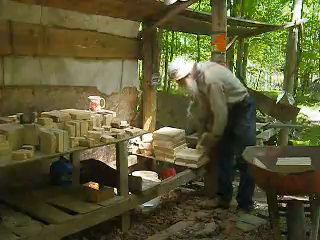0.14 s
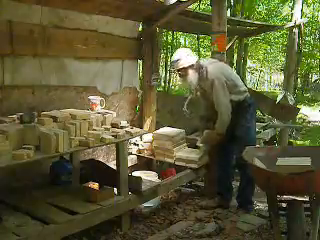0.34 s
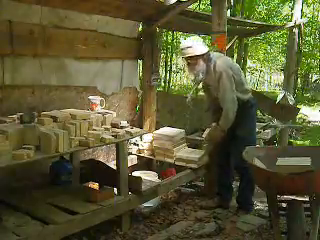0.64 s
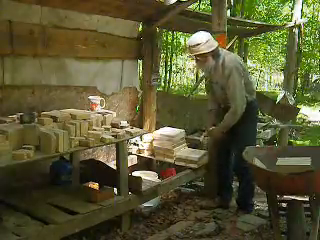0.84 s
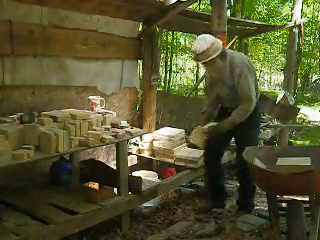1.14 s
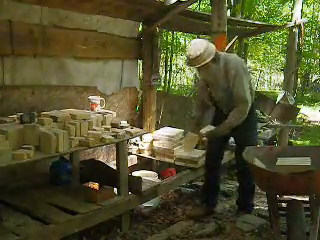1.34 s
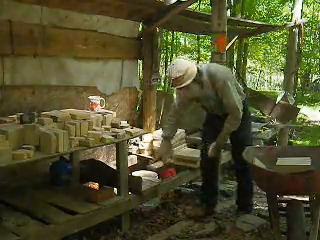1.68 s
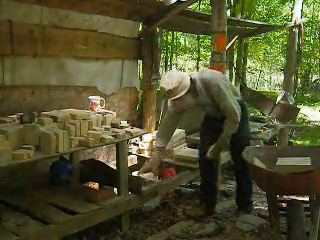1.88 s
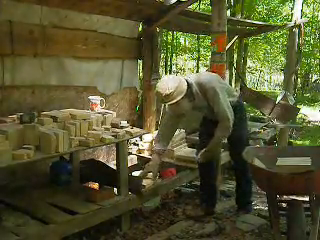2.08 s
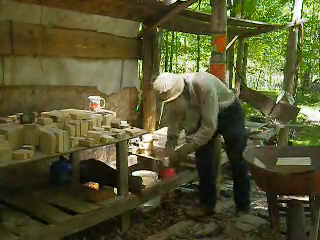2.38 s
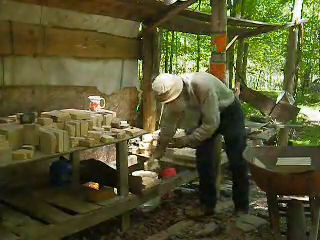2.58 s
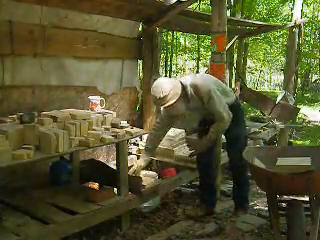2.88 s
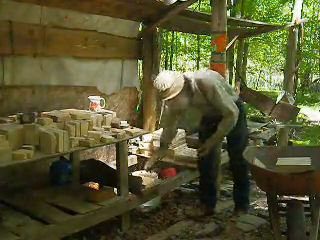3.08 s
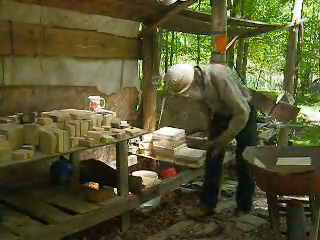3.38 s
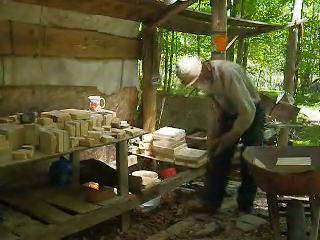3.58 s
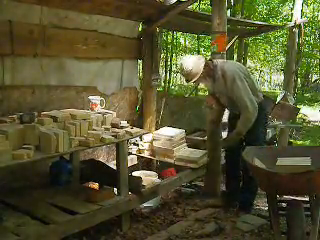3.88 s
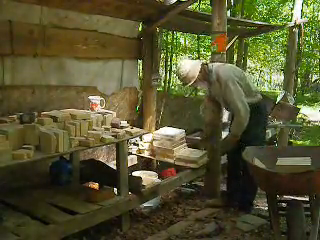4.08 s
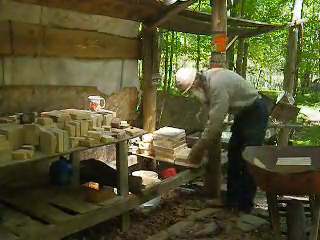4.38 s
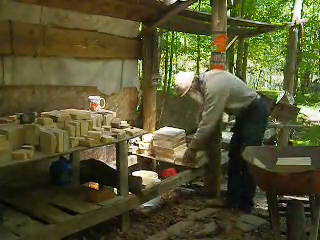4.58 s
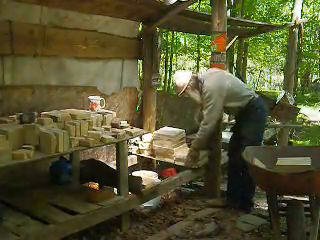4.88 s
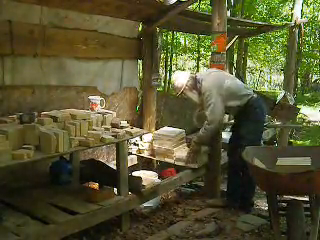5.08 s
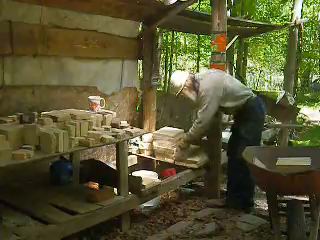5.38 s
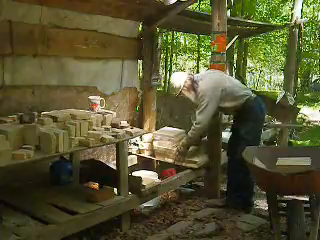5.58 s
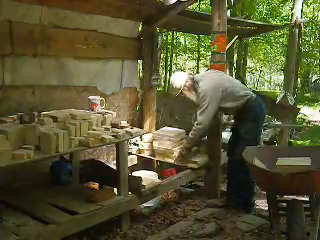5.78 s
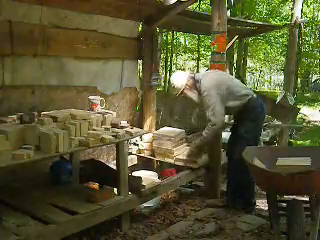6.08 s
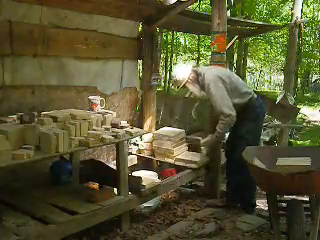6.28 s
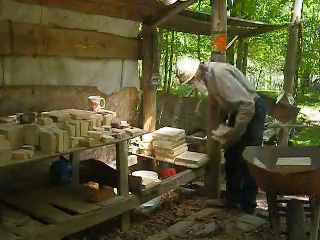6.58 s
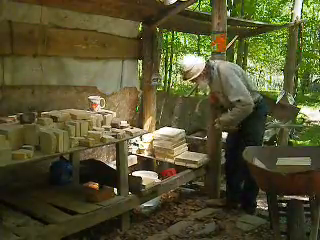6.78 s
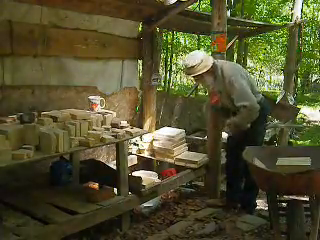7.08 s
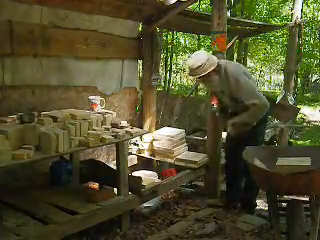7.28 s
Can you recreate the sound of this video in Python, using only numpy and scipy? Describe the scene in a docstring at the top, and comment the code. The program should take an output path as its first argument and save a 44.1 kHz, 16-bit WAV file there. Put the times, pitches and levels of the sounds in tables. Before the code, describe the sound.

At the very start a brick slab knocks and a ceramic shard clinks brightly on a smaller chip, then brushes it lightly. From about 0.7 to 1.35 seconds the shard grates across the chip in two long, ringing pulls. At 1.5 seconds a brick touches down softly on a stack. Louder, rocking clacks follow at 2.3 and 3.1 seconds, with wooden boards booming beneath, and a lighter one near 3.9, with gritty scuffs in between and just after. From 5 seconds a larger slab shifts with small taps, then knocks firmly into place at about 5.7. It taps again near 6 seconds, shuffles faintly, and ends with two short scraping pushes around 7.3 and 7.4. The knocks have a short, tight echo from the open shed. A steady outdoor hush and low rumble lie underneath, and a small, coarse microphone adds a gritty hiss throughout.

```python
"""Sorting broken firebricks in an open shed. First a slab knocks, and a shard clinks on a smaller chip,
brushes it and grates across it in two long pulls. From 1.5 s bricks are set down on a stack: they clack,
rock and scuff, and the wooden boards boom beneath. From 5 s the larger slab is shifted and knocked
into place, ending on two short pushes. A steady outdoor hush and a low rumble lie under it all,
and a small camera's coarse sampling adds a gritty sheen throughout."""
import sys
import numpy as np
from scipy import signal
from scipy.fft import rfft, irfft, next_fast_len
from scipy.io import wavfile
from scipy.ndimage import map_coordinates

SR = 44100
rng = np.random.default_rng(int(sys.argv[2]) if len(sys.argv) > 2 else 0)


def master_out(mix):
    """Clip the mix to full scale and print it as 16-bit PCM to the path in sys.argv[1]."""
    frames = np.transpose(np.atleast_2d(mix))
    ceiling = np.clip(frames, -1, 1)
    pcm = np.round(ceiling * 32767).astype(np.int16)
    wavfile.write(sys.argv[1], SR, pcm)


N = 328104
TIME = np.arange(N) / SR

# The voices of the loose pieces. Each row: pitch in Hz, ring time (t60) in seconds,
# relative level in dB when struck, and when rubbed.
SHARD_MODES = [(3025, 0.08, -2.5, -5), (2987, 0.09, -7.5, -4.5), (3104, 0.097, -4, 3), (3124, .025, -4, -8),
               (2887, 0.027, 6, -8)]
CHIP_MODES = [(1996, 0.1, -5.5, -22), (2715, 0.091, 1, 2.5), (2780, 0.065, -0.5, -10)]
SLAB_MODES = [(1403, 0.13, -3, -3.5), (1735, .11, -1.5, -4.5), (1793, 0.077, -3.5, -8),
              (2156, 0.076, -7, -2.5), (3546, 0.084, -4.5, 3.5)]
# The voices of one brick, the stack and the boards beneath it.
# Each row: pitch in Hz, ring time (t60) in seconds, relative level in dB.
BRICK_MODES = [(1180, 0.085, -3), (1415, .1, -4), (1840, 0.09, 2), (2490, .11, -7), (2560, 0.062, 3)]
STACK_MODES = [(414, 0.15, -6), (472, 0.11, -9), (523, 0.071, 2.5), (695.4, 0.075, -3.5),
               (923, 0.053, -4.5), (1227, 0.097, -19)]
BOARD_MODES = [(215, 0.081, -3), (208.2, 0.46, -23), (323, 0.098, -10)]
# Tone curves for the hits, the friction and the background. Each row: frequency in Hz, gain in dB.
CLACK_EQ = [(25, -39), (60, -32), (200, -27.5), (700, -11), (1000, 2), (1700, 3), (3000, -6), (4000, 0.5)]
THUD_EQ = [(40, -27), (140, -9.5), (210, -7.5), (500, -2), (720, -3.5), (1000, -14), (2000, -33.5),
           (4000, -48)]
RUB_EQ = [(60, -21), (250, -10.5), (550, 0.5), (1000, -2), (1900, 2), (2700, -5.5), (4000, -9), (4400, -51)]
GRIT_EQ = [(200, -16), (1200, -20), (2200, -3), (3100, 1.5), (4000, 2.5), (4400, -50)]
HUSH_EQ = [(20, -15), (60, -11), (90, 0), (140, 1.5), (300, 0), (600, -2.5), (1200, -5.5), (2500, -6.5),
           (4000, -5.5), (4400, -49)]
RUMBLE_EQ = [(12, -18), (30, -0.5), (60, 4.0), (100, -3.0), (200, -31), (600, -80)]

# Cue levels are faders: each sets one layer's strength from cue to cue.
# Bricks land on the stack. Each row: start in seconds, stack thud, board boom and clack in dB,
# treble corner in Hz, loss on the first rock in dB.
BRICK_LANDINGS = [ (1.503, -31, -32.5, -54, 3000, 5.5), (2.261, -23, -17, -28, 700, 2),
                  (2.288, -22, -42, -33, 900, 16.5), (2.3196, -17, -27.5, -10.5, 1780, 6.5),
                  (3.1235, -28.5, -38.5, -34.5, 1000, 4.5), (3.1345, -22.5, -14, -21, 1210, 3),
                  (3.192, -35, -32.5, -39.5, 900, 0.5), (3.9466, -27.5, -29.5, -33.5, 2500, 21.5), ]
# The slab hits its neighbours. Each row: start in seconds, slab ring, stack thud and clack in dB,
# treble corner in Hz, first rocking gap in seconds.
SLAB_HITS = [ (0.03, -26, -42, -46, 1900, 0.015), (5.053, -40.5, -38, -43, 2400, 0.022),
             (5.147, -46, -45, -44, 3000, .006), (5.672, -33, -35.5, -31.5, 2200, .005),
             (5.7345, -18, -20.5, -21.5, 1600, .0055), (5.969, -50, -40.5, -30.5, 6900, 0.0094), ]
# The shard brushes the chip. Each row: middle and length in seconds, ring in dB.
SHARD_BRUSHES = [(0.051, 0.11, -40), (0.197, 0.15, -50.5), (0.423, 0.1, -43.5)]
# Two pulls across the chip, one envelope each. Each row: time in seconds, ring and rub in dB.
SHARD_PULLS = [
    [(0.72, -55, -54), (0.726, -59, -67.5), (0.756, -39.5, -44), (0.8, -34, -48.5), (0.834, -34.5, -56.5),
     (0.848, -33.5, -51), (0.864, -38.5, -50.5), (0.928, -54, -65), (0.93, -52, -58)],
    [(0.93, -51, -63), (0.974, -43.5, -48.5), (0.988, -44, -57), (1.094, -42, -40), (1.13, -48, -43.5),
     (1.252, -38, -50), (1.306, -64, -55.5), (1.34, -56, -57), (1.35, -72, -57)],
]
# Bricks scuff the stack. Each row: middle and length in seconds, coarse rub and fine grit in dB.
BRICK_SCUFFS = [ (1.516, 0.059, -44, -41), (2.669, 0.18, -52.5, -57), (2.741, 0.049, -47.5, -47),
                (3.141, 0.057, -43.5, -49.5), (3.205, 0.058, -51.5, -51.5), (3.772, .2, -68, -52),
                (3.996, .12, -50, -48), (4.085, 0.081, -42, -37), ]
# The slab is pushed along. Each row: middle and length in seconds, rub and ring in dB.
SLAB_PUSHES = [ (5.082, 0.14, -52, -53.5), (5.727, 0.058, -52.5, -48), (5.969, 0.033, -47.5, -47.5),
               (6.012, 0.028, -53, -48), (6.146, .13, -51, -62), (7.282, 0.065, -49.5, -44),
               (7.431, 0.073, -49.5, -44.5), ]
# Soft low bumps. Each row: start in seconds, level in dB, pitch in Hz.
LOW_BUMPS = [(1.536, -37.5, 128), (2.32, -35, 95.5), (2.511, -34, 57.1), (5.32, -47, 55.2)]
# The rumble rises and falls. Each row: middle and length in seconds, level in dB.
RUMBLE_SWELLS = [(2.9, 0.28, -56.5), (5.264, 0.42, -54.5), (6.727, 0.28, -58)]

CLINK_S, CLINK_CORNER_HZ = 0.0717, 11900
CLINK_SHARD_DB, CLINK_CHIP_DB, CLINK_CLACK_DB, CLINK_THUD_DB = -8.5, -15, -14.5, -61
BRICK_RING_DB, SIDEWAYS_BOOM_DB = -9, -12.5  # trims: ring from the clack fader, boom from the thud fader
PULL_RING_DB, PULL_RUB_DB = 1.4, -0.3  # trims on the pull envelopes
BRUSH_RUB_DB, SHARD_GRIT_DB, PUSH_GRIT_DB = -10, -6, -3.5  # rub against ring; grit against rub
HANDOVER_S, HANDOVER_DB_PER_S, HANDOVER_LIMIT_DB = 1, 33, 6  # crossfade from shard to chip
HUSH_DB, RUMBLE_FLOOR_DB = -48.5, -62.5
CAMERA_HZ, TOP_HZ, STEPS = 8000, 15700, 128  # sample rate, treble cutoff, steps from zero to full scale


def knocks():
    """Each contact cracks, thuds through the stack into the boards and rings the pieces that touch."""
    out = np.zeros(N)
    crush_age = np.arange(SR // 50) / SR / 0.000974  # 1 at the main impact
    thud = impulse(lambda hz: colour(THUD_EQ, hz))
    for s, thud_db, boom_db, clack_db, corner_hz, bodies in [*shard_clink(), *set_downs(), *slab_knocks()]:
        # high spots of the rough faces crush for a millisecond around the main impact
        crush = rng.standard_normal(len(crush_age)) * crush_age * np.exp(-crush_age)
        crush *= amp(-2.5) / np.linalg.norm(crush)
        crush[np.argmin(np.abs(crush_age - 1))] += 1
        # trapped sand leaves some treble even in a soft contact
        contact = impulse(lambda hz: colour(CLACK_EQ, hz) * (softness(hz, corner_hz) + amp(-5.5)))
        clack = signal.fftconvolve(crush, contact)
        add(out, s - .001, amp(clack_db + 17.5) * shed_echo(clack, wet_db=1, t60=0.14))
        add(out, s, amp(thud_db + 30) * shed_echo(thud, wet_db=6.5, t60=0.15))
        stack = amp(thud_db - 1) * ring(STACK_MODES, scatter_db=-0.2)
        boards = amp(boom_db) * ring(BOARD_MODES, scatter_db=1.2)
        pieces = sum(amp(db) * ring(modes, scatter_db=1.5, corner_hz=corner_hz) for modes, db in bodies)
        ringing = low_cut(stack + boards, low_hz=181) + pieces
        add(out, s, shed_echo(ringing, wet_db=-15.5, t60=0.37))
    return out


def set_downs():
    """Contacts of bricks landing on the stack and tipping from edge to face."""
    for start, thud_db, boom_db, clack_db, corner_hz, loss_db in BRICK_LANDINGS:
        for s, db in rocking(start, gap_s=.0102, loss_db=loss_db):
            bodies = [(BRICK_MODES, clack_db + BRICK_RING_DB + db)]
            yield s, thud_db + db, boom_db + db, clack_db + db, corner_hz, bodies


def slab_knocks():
    """Contacts of the slab knocking sideways into its neighbours, with little boom from the boards."""
    for start, ring_db, thud_db, clack_db, corner_hz, gap_s in SLAB_HITS:
        for s, db in rocking(start, gap_s, loss_db=1.5):
            bodies = [(SLAB_MODES, ring_db + db)]
            yield s, thud_db + db, thud_db + SIDEWAYS_BOOM_DB + db, clack_db + db, corner_hz, bodies


def shard_clink():
    """Hard, bright contacts of the shard chattering on the chip; both ring."""
    for s, db in rocking(CLINK_S, gap_s=.0031, loss_db=1):
        bodies = [(SHARD_MODES, CLINK_SHARD_DB + db), (CHIP_MODES, CLINK_CHIP_DB + db)]
        thud_db = CLINK_THUD_DB + db
        yield s, thud_db, thud_db + SIDEWAYS_BOOM_DB, CLINK_CLACK_DB + db, CLINK_CORNER_HZ, bodies


def rocking(s, gap_s, loss_db, shrink=.9):
    """A piece rocks to rest: time and level of three touches, ever sooner and weaker."""
    touch = np.arange(3)
    gaps = gap_s * shrink ** touch
    return zip(s + np.cumsum(gaps) - gaps, -loss_db * touch ** 2)


def ring(modes, scatter_db, corner_hz=SR, rubbed=False):
    """One body rings out in damped modes, their balance scattered as if touched at a random spot."""
    t = np.arange(SR // 3) / SR
    hz, t60, *levels = np.transpose(modes)[:, :, None]
    db = levels[-1] if rubbed else levels[0]
    gains = amp(db + scatter_db * rng.standard_normal(hz.shape))
    gains *= rng.choice([-1, 1], hz.shape) * softness(hz, corner_hz)
    partials = gains * amp(-60 * t / t60) * np.sin(2 * np.pi * hz * t)
    return np.sum(partials, axis=0) / np.linalg.norm(amp(db))


def softness(hz, corner_hz):
    """A softer, longer contact rolls off the treble above its corner."""
    return 1 / np.sqrt(1 + (hz / corner_hz) ** 2)


def low_cut(x, low_hz):
    """The ring of stack and boards is cut below low_hz, so it carries little deep bass."""
    return signal.sosfilt(signal.butter(2, low_hz, "highpass", fs=SR, output="sos"), x)


def scrapes():
    """Sliding pieces rub, hiss with grit and sing in their own modes."""
    shard_rub, shard_grit, shard, chip = shard_strokes()
    brick_rub, brick_grit = brick_strokes()
    slab_rub, slab_grit, slab = slab_strokes()
    powers = [shard_rub + brick_rub + slab_rub, shard_grit + brick_grit + slab_grit, shard, chip, slab]
    faces = [impulse(lambda hz: colour(eq, hz)) for eq in (RUB_EQ, GRIT_EQ)]
    pieces = [ring(modes, scatter_db=1.7, rubbed=True) for modes in (SHARD_MODES, CHIP_MODES, SLAB_MODES)]
    out = np.zeros(N)
    for power, body in zip(powers, faces + pieces):
        damped = body * amp(-60 * np.arange(len(body)) / SR / .33)  # the rubbing faces choke the ring
        friction = grating(np.sqrt(power), grains_per_s=5000, spiky_db=1.53)
        out += signal.oaconvolve(friction, damped / np.linalg.norm(damped))[:N]
    return shed_echo(out, wet_db=-6, t60=0.033)[:N]


def shard_strokes():
    """Power envelopes of rub, grit, shard ring and chip ring as the shard slides on the chip."""
    singing = sum(swell(*row) for row in SHARD_BRUSHES)
    rub = amp(BRUSH_RUB_DB) ** 2 * singing
    for pull in SHARD_PULLS:
        s, ring_db, rub_db = np.transpose(pull)
        sliding = (TIME >= s[0]) & (TIME < s[-1])
        singing += sliding * amp(np.interp(TIME, s, ring_db) + PULL_RING_DB) ** 2
        rub += sliding * amp(np.interp(TIME, s, rub_db) + PULL_RUB_DB) ** 2
    # as the contact travels, the ring passes from shard to chip
    chip_lead_db = np.clip(HANDOVER_DB_PER_S * (TIME - HANDOVER_S), -HANDOVER_LIMIT_DB, HANDOVER_LIMIT_DB)
    shard = singing / (1 + amp(chip_lead_db) ** 2)
    return rub, amp(SHARD_GRIT_DB) ** 2 * rub, shard, singing - shard


def brick_strokes():
    """Power envelopes of rub and grit as bricks scuff over the stack."""
    rub = sum(swell(s, length, db) for s, length, db, _ in BRICK_SCUFFS)
    grit = sum(swell(s, length, db) for s, length, _, db in BRICK_SCUFFS)
    return rub, grit


def slab_strokes():
    """Power envelopes of rub, grit and ring as the slab is pushed, and shuffled under uneven pressure."""
    shuffle = swell(middle_s=6.69, length_s=1, db=-58) * amp(2.5 * wobble(per_s=18)) ** 2
    rub = shuffle + sum(swell(s, length, db) for s, length, db, _ in SLAB_PUSHES)
    singing = amp(-3) ** 2 * shuffle + sum(swell(s, length, db) for s, length, _, db in SLAB_PUSHES)
    return rub, amp(PUSH_GRIT_DB) ** 2 * rub + shuffle, singing


def grating(pressure, grains_per_s, spiky_db):
    """Sand grains catch and slip at random under a pressure curve."""
    slips = (rng.random(N) < grains_per_s / SR) * rng.standard_normal(N)
    return pressure * unit(slips * amp(spiky_db * wobble(per_s=160)))


def shed_echo(x, wet_db, t60):
    """Nearby bricks, boards and roof add a short, dense tail to the dry sound."""
    t = np.arange(SR // 3) / SR
    echo = rng.standard_normal(len(t)) * amp(-60 * t / t60) * (1 - np.exp(-t / 0.0015))
    echo *= amp(wet_db) / np.linalg.norm(echo)
    echo[0] += 1
    return signal.fftconvolve(x, echo)


def bumps():
    """Dull low bumps, gone in a few cycles."""
    out, t = np.zeros(N), np.arange(SR // 4) / SR
    age = t / .011  # 1 at the envelope's peak
    for s, db, hz in LOW_BUMPS:
        add(out, s, amp(db) * age * np.exp(1 - age) * np.sin(2 * np.pi * hz * t))
    return out


def background():
    """An even bed of woodland hush and microphone hiss over a light, swelling rumble."""
    hush = unit(filtered(rng.standard_normal(N), lambda hz: colour(HUSH_EQ, hz)))
    rumble = unit(filtered(rng.standard_normal(N), lambda hz: colour(RUMBLE_EQ, hz)))
    rumble_power = amp(RUMBLE_FLOOR_DB) ** 2 + sum(swell(*row) for row in RUMBLE_SWELLS)
    return amp(HUSH_DB) * hush + np.sqrt(rumble_power) * rumble


def amp(db):
    """Decibels to gain."""
    return 10 ** (np.asarray(db) / 20)


def unit(x):
    """Scale to rms 1."""
    return x / np.sqrt(np.mean(x ** 2) + 1e-20)


def colour(eq, hz):
    """Gain of a tone curve, its points joined on a log frequency axis."""
    points_hz, db = np.transpose(eq)
    return amp(np.interp(np.log(hz + 1), np.log(points_hz), db))


def filtered(x, response):
    """Equalise a sound with a frequency response."""
    size = next_fast_len(len(x) + 8192)
    return irfft(rfft(x, size) * response(np.fft.rfftfreq(size, 1 / SR)), size)[:len(x)]


def impulse(response, size=4096):
    """The tightest click with this tone (minimum phase)."""
    cepstrum = irfft(np.log(response(np.fft.rfftfreq(size, 1 / SR)) + 1e-6))
    cepstrum[1:size // 2] *= 2
    cepstrum[size // 2 + 1:] = 0
    return irfft(np.exp(rfft(cepstrum)))


def swell(middle_s, length_s, db):
    """Power envelope of one smooth rise and fall."""
    power, near = np.zeros(N), np.abs(TIME - middle_s) < 2 * length_s
    power[near] = amp(db) ** 2 * np.exp(-np.abs(2 * (TIME[near] - middle_s) / length_s) ** 3)
    return power


def wobble(per_s):
    """A smooth curve through per_s random points a second."""
    return map_coordinates(rng.standard_normal(int(N * per_s / SR) + 4), [TIME * per_s])


def add(track, s, sound):
    """Mix a sound into the track at s seconds."""
    part = track[max(round(s * SR), 0):][:len(sound)]
    part += sound[:len(part)]


def scene():
    """The mono mix, all sources at one microphone."""
    return (knocks() + scrapes() + bumps() + background())[None]


def record(dry):
    """The camera holds slow, coarse samples: gritty hiss, and the band below 4 kHz mirrored above it."""
    samples = signal.resample_poly(dry[0], CAMERA_HZ, SR)
    stepped = np.floor(np.clip(samples, -1, 1) * STEPS) / STEPS
    held = stepped[np.arange(N) * CAMERA_HZ // SR]
    return filtered(held, lambda hz: hz < TOP_HZ)[None]


dry = scene()
out = record(dry)
master_out(out)
```